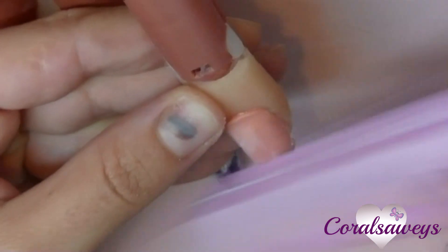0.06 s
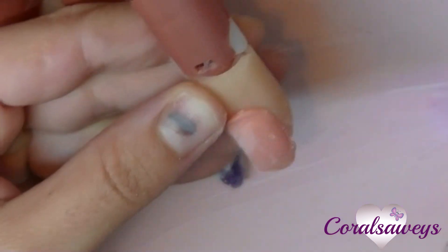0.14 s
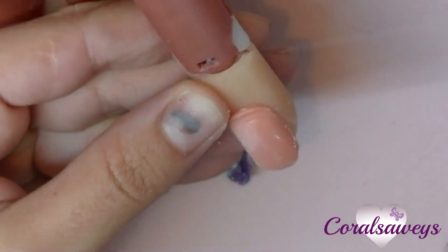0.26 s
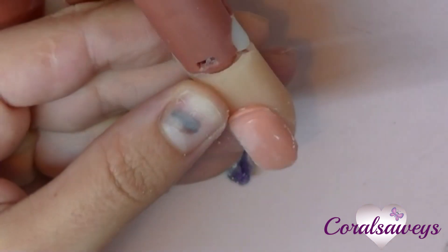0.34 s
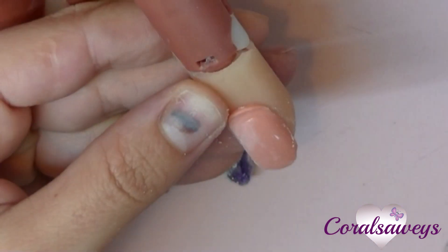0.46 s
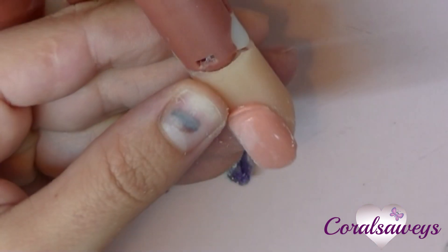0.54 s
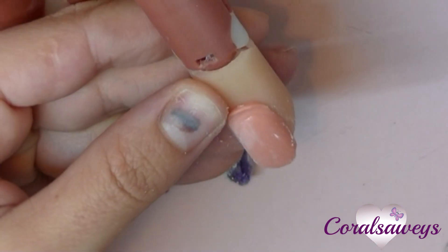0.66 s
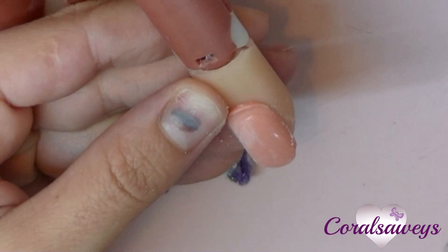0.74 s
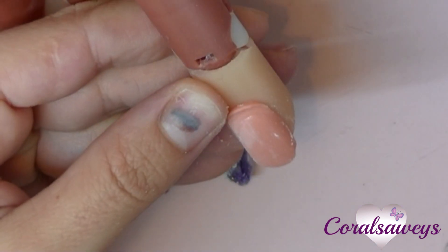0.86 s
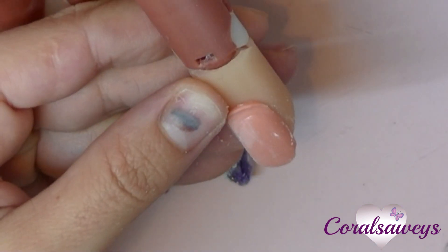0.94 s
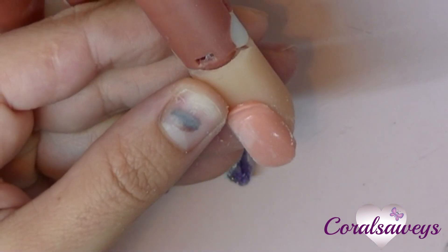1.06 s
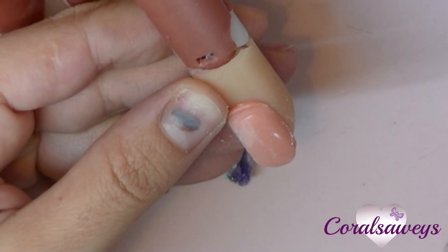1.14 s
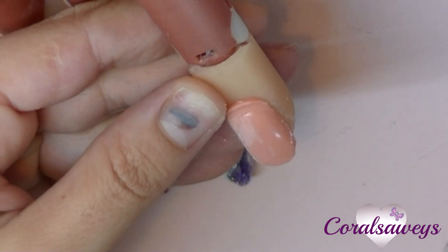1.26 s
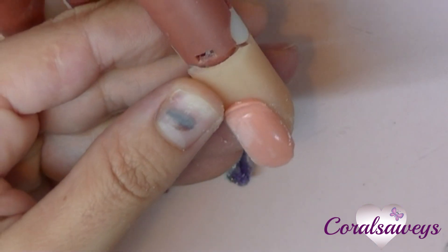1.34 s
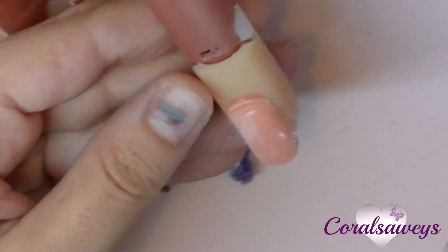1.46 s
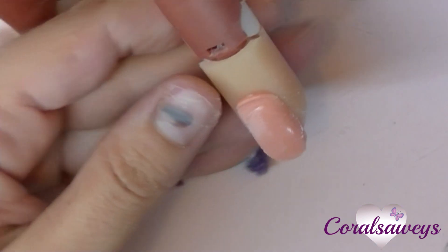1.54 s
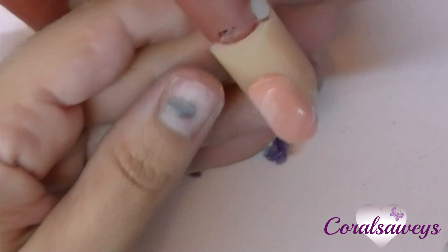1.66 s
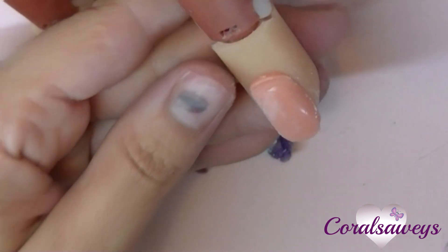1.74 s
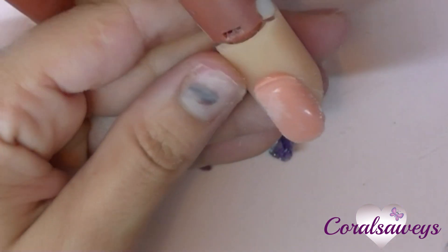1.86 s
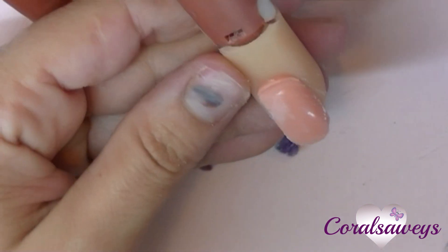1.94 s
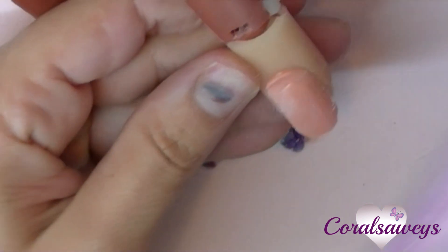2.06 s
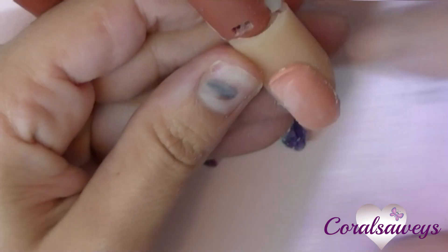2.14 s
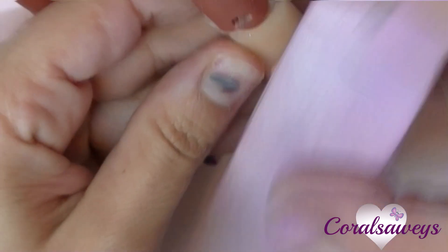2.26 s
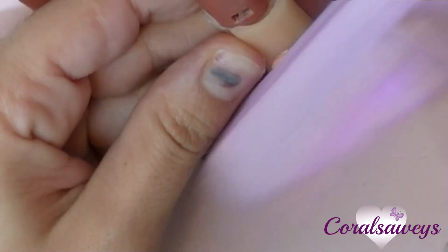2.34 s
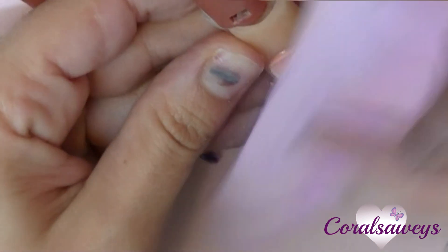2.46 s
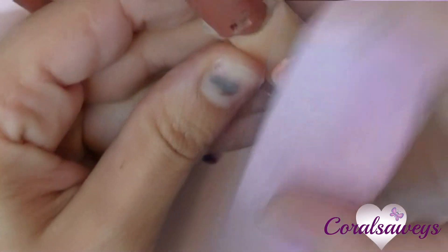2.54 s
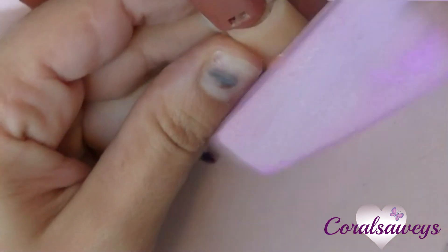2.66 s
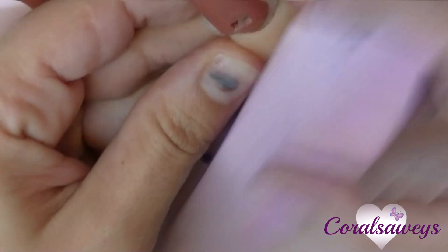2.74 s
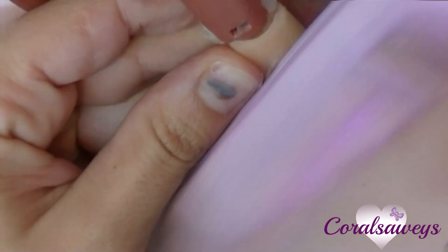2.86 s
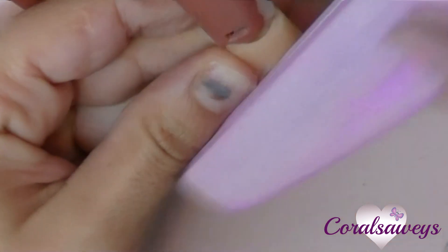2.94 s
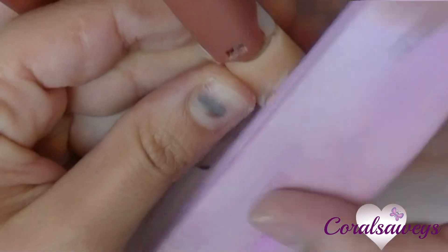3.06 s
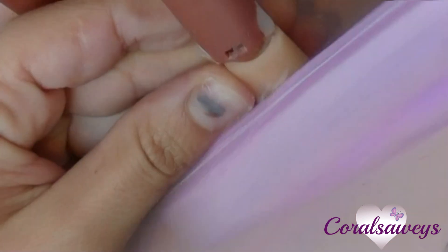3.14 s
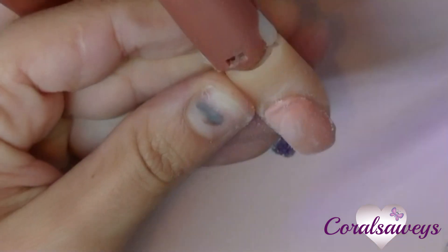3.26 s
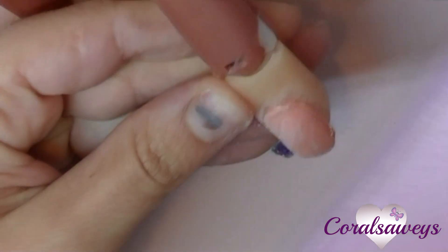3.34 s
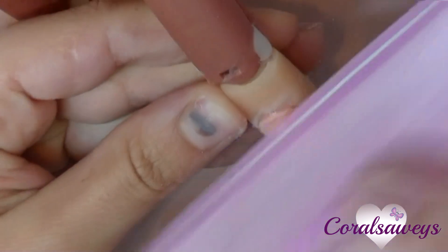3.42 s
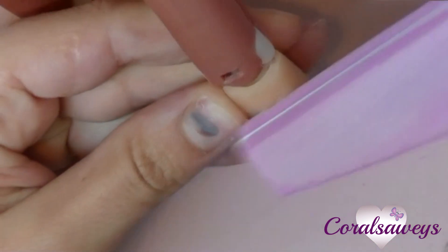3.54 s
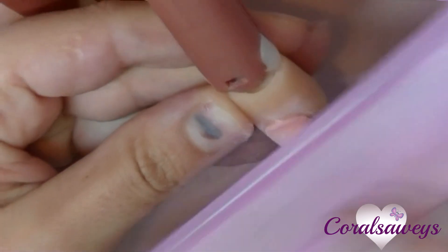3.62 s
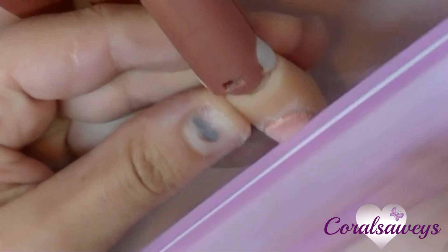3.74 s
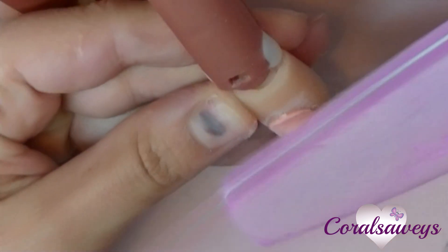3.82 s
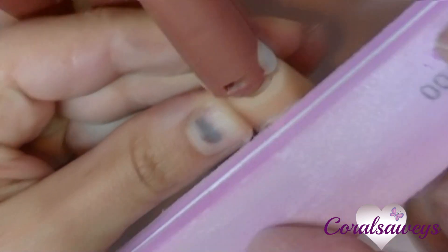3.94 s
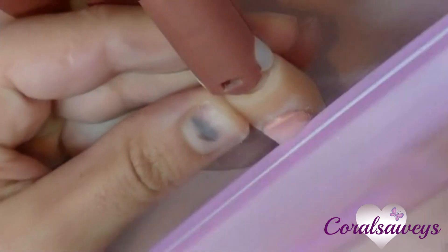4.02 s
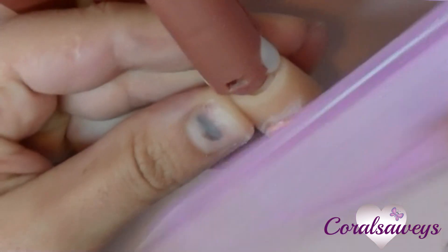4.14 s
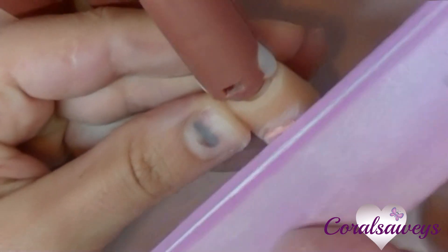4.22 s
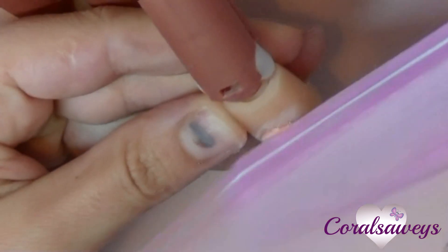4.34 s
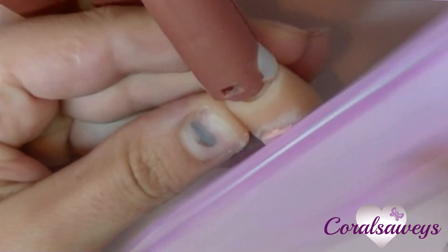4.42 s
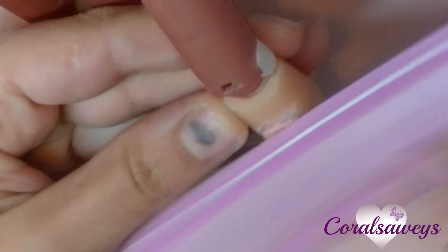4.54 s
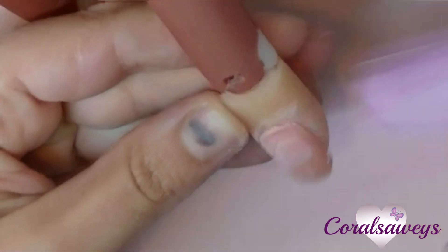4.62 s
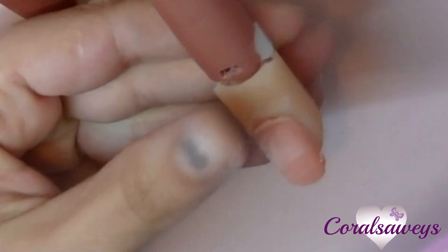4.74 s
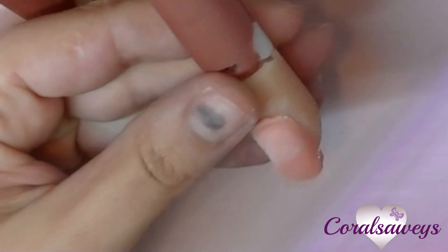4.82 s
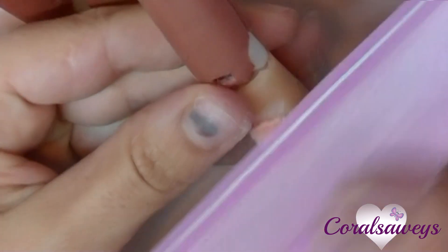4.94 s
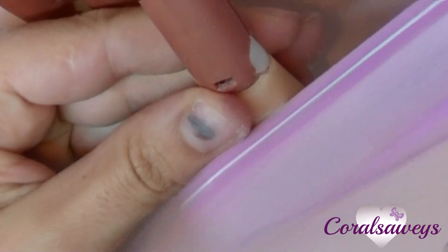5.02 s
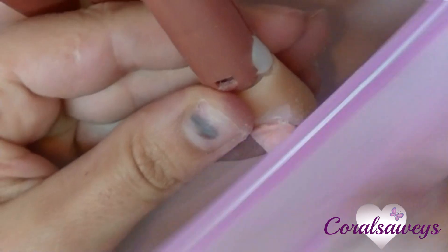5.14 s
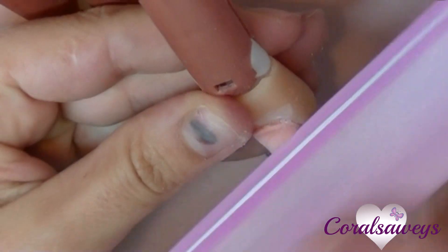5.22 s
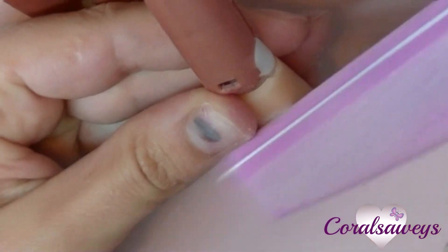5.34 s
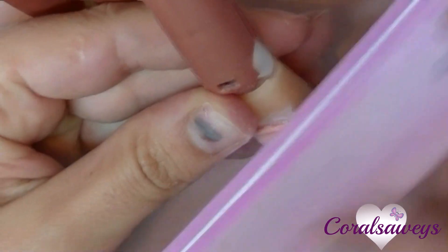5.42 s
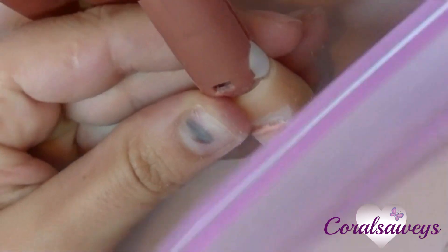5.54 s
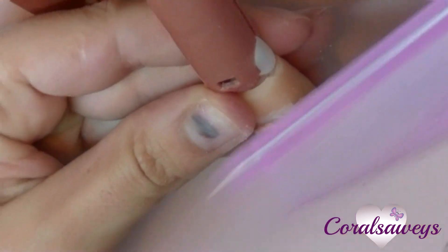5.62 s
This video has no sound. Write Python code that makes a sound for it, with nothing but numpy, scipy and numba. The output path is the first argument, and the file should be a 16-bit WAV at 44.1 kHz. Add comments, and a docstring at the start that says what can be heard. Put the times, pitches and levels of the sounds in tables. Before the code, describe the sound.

A buffer block scratches over a false nail in short, dry to-and-fro strokes, pausing for faint rustles before quick rhythmic rubbing resumes.

```python
"""A foam buffer block is rubbed to and fro over a nail on a plastic practice finger, close to the microphone.
Thousands of tiny grit slips drive a hiss, a gliding nail ring and the duller body of block and finger.
Hard catches crack and ring, and the hand bumps and drags on the table, shaking its modes.
Softer rubs and brushes follow the first strokes, and faint whistles of narrow noise come and go.
A small quiet room answers with a short diffuse tail over a steady bed of air noise."""
import sys
import numpy as np
from scipy import signal
from scipy.fft import rfft, irfft, next_fast_len
from scipy.io import wavfile
from scipy.ndimage import uniform_filter1d
from numba import njit

SR = 44100
rng = np.random.default_rng(int(sys.argv[2]) if len(sys.argv) > 2 else 0)


def generate_wav(signal):
    """Clip the signal to [-1, 1] and save it as 16-bit WAV at the path in sys.argv[1]."""
    frames = np.transpose(np.atleast_2d(signal))
    scaled = np.clip(frames, -1, 1) * 32767
    pcm = np.round(scaled).astype(np.int16)
    wavfile.write(sys.argv[1], SR, pcm)


N = 250929

# Strokes of the block over the nail; levels feed the mix in rubbing() and the drag in table():
# (start [s], length [s], rise [ms], rub level [dB], swell from start to end [dB], mid-stroke arch [dB],
#  nail ring level [dB], nail ring [Hz], grit ring [Hz], block body level [dB], brightness [dB],
#  table drag level [dB])
BLOCK_STROKES = [ (0.0, 0.068, 3.8, -33, -2.5, 2, -9, 4430, 7900, -14.5, 8, -49),
                 (0.101, 0.095, 2.5, -34, -2.5, 0.8, -10, 4200, 8000, -18.5, 6.5, -48),
                 (2.344, 0.13, 26, -32, 3, 2, 1, 4300, 7700, -15, 2, -53.5),
                 (2.515, 0.099, 4.3, -29, -1, -1, -1.5, 4350, 8100, -18.5, 0, -46.5),
                 (2.643, 0.1, 3.7, -28.5, -1, -1.5, -6.5, 4170, 7900, -18, 1, -42),
                 (2.773, 0.093, 3.3, -26.5, 0.5, -0.7, -1, 4490, 8150, -16.5, -1, -42),
                 (2.905, .100, 14, -28.5, -5.5, 2, 0.5, 4400, 7900, -13.5, 3, -42),
                 (3.048, 0.088, 17, -28.5, -1.5, 2, -2.5, 4350, 8400, -13.5, 1, -40),
                 (3.179, 0.12, 17, -28, 3, 1.2, -6.5, 4190, 7600, -16.5, 2, -46.5),
                 (3.505, 0.12, 30, -33.5, 5, 1, -11, 4100, 7100, -9.5, 5, -46),
                 (3.661, .100, 18, -30, -11, -1.6, -12, 4050, 7740, -14, 6, -47.5),
                 (3.795, 0.12, 15, -34, -3, 4.5, -19, 3980, 8100, -16.5, 4, -48),
                 (3.938, 0.1, 7, -31, .5, 0.5, -12, 3965, 8160, -17, 5, -54),
                 (4.075, 0.11, 1.8, -30.5, 0, -1, -14, 3900, 7900, -15.5, 5.5, -61),
                 (4.215, .100, 2.8, -32.5, -1, 5.5, -11, 4120, 7900, -15.5, 6.5, -48),
                 (4.344, .120, 11, -33.5, 0, 1, -31, 4120, 8150, -15, 6, -48.5),
                 (4.489, 0.092, 4, -31.5, -5.5, -0.3, -12, 4240, 7800, -15.5, 7, -48),
                 (4.604, 0.12, 9, -32, 5, 1, -16, 4130, 7740, -15.5, 4.5, -45),
                 (5.024, .119, 23, -33.5, 3, 3, -7.5, 4100, 7600, -13.5, 4, -62),
                 (5.182, 0.1, 18.5, -31, -10.5, 2.5, -8, 3960, 7200, -14.5, 2.5, -56),
                 (5.318, 0.1, 3, -31.5, 6, -1.7, -10, 4040, 7700, -15.5, 6, -49.5),
                 (5.452, 0.09, 8.5, -28, 1.5, -0.5, -9, 3830, 7650, -15.5, -1, -49.5),
                 (5.577, 0.11, 8, -31.5, 1, -0.1, -17, 4070, 7800, -16, 4, -52)]
# Softer rubs and brushes after the first strokes, with levels used as for the strokes:
# (start [s], length [s], rise [ms], rub level [dB], swell [dB], fall [dB/s], nail ring level [dB],
#  body level [dB], brightness [dB], table drag level [dB])
SOFT_RUBS = [(0.266, 0.028, 4, -46, -3, 700, -17, -13, -11, -57),
             (0.332, 0.084, 2, -41, 8.5, 365, -17, -13.5, 0, -46.5),
             (0.482, 0.13, 29, -36, 1.5, 650, -29, -21.5, -6, -68),
             (0.662, 0.18, 4, -53.5, -7, 300, -26, -21, -18, -58),
             (0.83, 0.16, 11, -48, 1, 300, -17, -19, 10, -58),
             (0.962, .110, 15, -41.5, -9, 600, -7, -12.5, 5, -45.5),
             (1.100, 0.025, 9.2, -45.5, -1.5, 200, -3, -13, 1, -58),
             (1.175, 0.062, 5, -57.5, 3, 300, -1, -5, -10, -68),
             (1.243, 0.19, 10, -54.5, -14.5, 800, 1, -6, -9, -60),
             (1.482, .110, 12, -55, 7.5, 150, -12, -20, -1, -58),
             (1.690, 0.022, 8, -54.5, 1, 250, -10, -24, -6, -58),
             (1.773, 0.088, 5, -51.5, -4, 550, -10, -18, 1, -58),
             (1.879, .150, 30, -40.5, -10, 520, -24, -25, -10, -61),
             (2.131, 0.072, 10, -44, 18.5, 282, -35, -27, -17, -72),
             (2.273, 0.033, 10, -50.5, 7, 550, -24, -24, -8, -64)]
# A coarse patch of grit changes the bite for a moment: (centre [s], level change [dB], width [ms])
GRIT_FLARES = [(3.295, -1, 6.6), (3.689, 6, 8), (3.872, 1.5, 4.3), (4.175, 1.5, 5), (4.268, 1.5, 8.8),
               (4.719, 3, 4), (5.225, 3, 7.3), (5.52, 2, 6.9), (5.668, 3, 6)]
RUN_GAP_S = 0.25                        # stroke starts further apart than this split two runs
TURN_SHARE, LAND_SHARE = 0.13, 0.5      # share of level at first contact: after a turn, after landing
FALL_DB_PER_S, LIFT_DB_PER_S = 900, 3000        # loss as the block stops, as it lifts off
LIFT_STEP_DB, TRAIL_DB_PER_S = 12, 350  # the edge of the block drags on faintly after the lift
NAIL_LINGERS = 0.17                     # share of the loss that the nail ring is spared
DRAG_FOLLOWS = 0.29                     # share of the loss that the table drag follows
SOFT_ARCH_DB, SOFT_NAIL_HZ, SOFT_GRIT_HZ = 0.64, 4760, 7700
LIFTED_DRAG_DB = -61                    # the hand resting on the table


def strokes():
    """Each contact rises, arches, swells or sags, then falls away; the loudest one sets the colour."""
    apart = np.diff([row[0] for row in BLOCK_STROKES]) > RUN_GAP_S
    touches = np.where(np.append(True, apart), LAND_SHARE, TURN_SHARE)
    falls = np.where(np.append(apart, False), LIFT_DB_PER_S, FALL_DB_PER_S)
    contacts = [(touch, fall, *row) for touch, fall, row in zip(touches, falls, BLOCK_STROKES)]
    for start, length, rise_ms, db, swell_db, fall, nail_db, *rest in SOFT_RUBS:
        contacts.append((TURN_SHARE, fall, start, length, rise_ms, db, swell_db, SOFT_ARCH_DB,
                         nail_db, SOFT_NAIL_HZ, SOFT_GRIT_HZ, *rest))

    rub = np.full(N, 1e-6)
    # rows: nail dB, nail Hz, grit Hz, body dB, brightness dB, drag dB
    idle = [-16.0, SOFT_NAIL_HZ, SOFT_GRIT_HZ, -16, 0, LIFTED_DRAG_DB]
    colour = np.tile(np.array(idle)[:, None], N)
    for touch, fall, start, length, rise_ms, db, swell_db, arch_db, *own in contacts:
        span = slice(round(start * SR), min(N, round((start + length + 0.2) * SR)))
        since = np.arange(span.stop - span.start) / SR
        done = np.minimum(since / length, 1)
        after = np.maximum(since - length, 0)
        loss_db = fall * after
        if fall == LIFT_DB_PER_S:
            loss_db = np.minimum(loss_db, LIFT_STEP_DB + TRAIL_DB_PER_S * after)
        shape_db = swell_db * (done - 0.5) + arch_db * np.sin(np.pi * done) - loss_db
        rise = 1 - (1 - touch) * np.exp(-since * 1000 / rise_ms)
        gain = amp(db + shape_db) * rise
        leads = gain > rub[span]
        colour[:, span] = np.where(leads, np.array(own)[:, None], colour[:, span])
        colour[0, span] += leads * NAIL_LINGERS * np.minimum(loss_db, 30)
        colour[5, span] -= leads * DRAG_FOLLOWS * np.minimum(loss_db, 40)
        rub[span] = np.hypot(rub[span], gain)

    t = np.arange(N) / SR
    flare_db = sum(db * np.exp(-0.5 * ((t - s) * 1000 / ms) ** 2) for s, db, ms in GRIT_FLARES)
    rub = rub * amp(flare_db)
    return uniform_filter1d(rub, size=60), uniform_filter1d(colour, size=400, axis=1)


# Spectrum of the grit hiss: (frequency [Hz], relative level per Hz [dB])
GRIT_SPECTRUM = [(1760, -17), (3000, -13), (3990, -9.5), (4950, -4), (7300, -0.5), (10200, -3.5),
                 (13400, -10.5), (14500, -17), (15800, -9.5)]
# Spectrum of the foam block's body: (frequency [Hz], relative level per Hz [dB])
BLOCK_SPECTRUM = [(410, -3), (700, -4), (882, -18), (1140, -5.5), (1500, -6), (2210, 0), (2410, -6),
                  (2630, 0.5), (3400, -2), (4420, -8.5), (7480, -120)]


def rubbing(rub, nail_db, nail_hz, grit_hz, body_db, bright_db):
    """One stream of slips drives the grit hiss, its ring, the nail, the block and the hollow finger."""
    force = slips(spread_db=0.5) * amp(0.79 * drift(44))      # pressure trembles along the stroke
    nail = gliding(force, nail_hz, 950.0, SR)
    nail = rms_one(gliding(nail, nail_hz, 950.0, SR))
    hollow = amp(-13) * rms_one(ring(force, 2750, 0.0081))    # the hollow finger

    force = patchy(force, depth_db=1.76)
    hiss = rms_one(coloured(force, GRIT_SPECTRUM))
    top = signal.sosfilt(signal.butter(2, 10500, "high", fs=SR, output="sos"), hiss)
    hiss = hiss + (amp(bright_db) - 1) * top                  # faster, lighter contact is brighter
    grit = rms_one(gliding(force, grit_hz * amp(0.5 * drift(21)), 2130.0, SR))
    body = rms_one(coloured(force, BLOCK_SPECTRUM)) * amp(0.28 * drift(40))

    mix = amp(-2.5) * hiss + amp(-8.5) * grit
    mix = mix + amp(nail_db - 8) * nail + amp(body_db) * (body + hollow)
    return rub * mix


SLIPS_PER_S = 9000


def slips(spread_db):
    """Grains of grit let go at random moments and in either direction, larger slips being rarer."""
    sizes = amp(spread_db * np.minimum(rng.exponential(1, N), 4.2))
    sizes = sizes * rng.choice([-1, 1], N)
    return rms_one(sizes * (rng.random(N) < SLIPS_PER_S / SR))


def patchy(x, depth_db):
    """The contact wanders over the nail, so each narrow band swells and sinks on its own."""
    size, edges = next_fast_len(N), np.geomspace(600, 18000, 17)
    spectrum = rfft(x, size)
    which = np.digitize(np.arange(size // 2 + 1) * SR / size, edges[1:-1])
    out = np.zeros(N)
    for k in range(len(edges) - 1):
        band = irfft(spectrum * (which == k), size)[:N]
        out += amp(depth_db * drift(5.6)) * band
    return out


# Something hard catches or knocks: (time [s], level before a 6 dB lift [dB], ring [Hz], decay [ms])
HARD_CATCHES = [(1.047, -33.5, 2670, 1.5), (1.056, -38.5, 1800, 6.2), (1.058, -46, 660, 24),
                (1.06, -42, 1296, 5.4), (1.114, -44, 6900, 1.2), (1.156, -46, 2700, 2.9),
                (1.268, -34, 2900, 0.75), (1.705, -42.5, 8150, 1.3), (1.801, -39, 2830, 0.64),
                (1.88, -35, 7600, 2), (1.9874, -24, 3150, 0.62), (1.988, -18.5, 9900, 0.98),
                (1.9901, -19.5, 3800, 0.38), (2.0173, -37, 3420, 0.94), (2.0175, -26, 9600, 0.67),
                (2.599, -16.5, 7800, 1.6), (2.768, -24, 8000, 0.76), (2.779, -13.5, 8900, 0.7),
                (4.718, -20, 6700, 1), (5.164, -35, 2500, 1.2), (5.663, -27.5, 4360, 3.5)]


def ticks():
    """Each catch is a broad crack and a ring; the crack dies with the ring or sooner."""
    out, ms = np.zeros(N), np.arange(5000) / SR * 1000
    for s, db, hz, decay_ms in HARD_CATCHES:
        shape = (1 - np.exp(-ms / 0.32)) * np.exp(-ms / decay_ms)
        tone = shape * np.sin(2 * np.pi * hz * ms / 1000)
        crack = rng.standard_normal(5000) * np.exp(-ms / min(decay_ms, 1.2))
        tick = tone + 0.27 * crack
        part = out[round(s * SR):][:5000]
        part += amp(db + 6) * tick[:len(part)]
    return out


# Hand bumps on the table: (time [s], relative level [dB], base pitch [Hz])
HAND_BUMPS = [(0.004, -18, 292), (0.28, -32, 260), (0.359, -31, 553), (0.446, -34.5, 244), (0.49, -37, 139),
              (0.774, -38, 228), (0.8, -37.5, 170), (0.83, -46, 150), (0.856, -45.5, 290),
              (0.953, -33, 131.5), (1.009, -40.5, 650), (1.02, -38, 170), (1.041, -27, 248),
              (1.066, -36, 191), (1.056, -37, 680), (1.088, -28.5, 150), (1.875, -39.5, 154),
              (1.985, -34.5, 702), (2.499, -33.5, 247), (2.594, -39, 286), (2.643, -22, 220),
              (2.944, -24, 306), (3.213, -30.5, 280), (3.515, -37, 193), (3.61, -46, 270),
              (3.833, -32.5, 292), (3.9, -33.5, 251), (4.181, -24, 242), (4.387, -33.5, 266),
              (4.49, -29, 267), (4.664, -34, 460), (5.045, -37, 250), (5.163, -24.5, 276),
              (5.344, -32.5, 248), (5.614, -26, 265), (5.654, -32.5, 450)]
# Modes of the table: (frequency [Hz], relative level [dB], t60 [s])
TABLE_MODES = [(141, -23, 0.2), (173, -11, 0.15), (206.8, -7, 0.38), (263.7, -1, 0.31), (291.8, -3.5, 0.35),
               (317, 9.5, 0.021), (460, 6, 0.053), (540, -13.5, 0.033), (616, -1.5, 0.12),
               (741, -5.5, 0.089), (860, -6, 0.065), (1430, -58, 0.056), (1800, -23, 0.077),
               (2100, -33, 0.098)]


def table(drag_db):
    """Bumps thud directly; they and the dragging hand shake the table, modes near a bump's pitch most."""
    out, t = np.zeros(N), np.arange(2000) / SR
    drag = amp(drag_db - 40 + 4.25 * drift(27)) * rng.standard_normal(N)
    pushes = rng.standard_normal((len(HAND_BUMPS), 2000))
    chance_db = rng.normal(0, 2.36, (len(HAND_BUMPS), len(TABLE_MODES)))
    fade = (1 - np.exp(-t / 0.0066)) * np.exp(-t / 0.0053)    # press and release, in seconds
    for s, db, bump_hz in HAND_BUMPS:
        # pitch bends up, then sags as the hand settles
        thud = fade * np.sin(2 * np.pi * bump_hz * t * (1 + 0.99 * fade))
        part = out[round(s * SR):][:2000]
        part += (amp(db + 4.0) * thud)[:len(part)]

    for k, (hz, level_db, t60) in enumerate(TABLE_MODES):
        force = drag.copy()
        for (s, db, bump_hz), push, luck_db in zip(HAND_BUMPS, pushes, chance_db):
            octaves_off = abs(np.log2(hz / bump_hz))
            push_db = db - 10.5 - 8.3 * octaves_off + luck_db[k]
            part = force[round(s * SR):][:2000]
            part += (amp(push_db) * push * fade / np.linalg.norm(fade))[:len(part)]
        out += amp(level_db) * ring(force, hz, t60)
    return out


# Faint short whistles: (start [s], end [s], frequency [Hz], level [dB])
FAINT_WHISTLES = [(2.15, 2.42, 1170, -60), (4.66, 4.9, 1395, -54.5), (4.69, 4.84, 2620, -60.5)]


def whistles():
    """Noise through a narrow resonance, swelling a little faster than it fades."""
    out, t = np.zeros(N), np.arange(N) / SR
    for start, end, hz, db in FAINT_WHISTLES:
        phase = np.clip((t - start) / (end - start), 0, 1)
        tone = rms_one(ring(rng.standard_normal(N), hz, 0.073))
        out += amp(db) * np.sin(np.pi * phase ** 0.77) * tone
    return out


# Decay of the room: (frequency [Hz], t60 [s])
ROOM_DECAY = [(150, 0.21), (1000, 0.73), (4000, 0.27), (8000, 0.34), (14000, 0.024)]


def room(x):
    """Two independent diffuse tails: octave bands of noise, each dying at its own rate."""
    t, tails = np.arange(SR // 2) / SR, 0
    for hz in 90 * 2.0 ** np.arange(8):
        edges = [hz / np.sqrt(2), hz * np.sqrt(2)]
        band = signal.butter(2, edges, "band", fs=SR, output="sos")
        noise = signal.sosfilt(band, rng.standard_normal((2, len(t))))
        tails = tails + noise * amp(-60 * t / at_hz(ROOM_DECAY, hz))
    tails = tails * (t > 0.004)
    tails = tails / np.sqrt((tails ** 2).sum(axis=1, keepdims=True))
    return signal.fftconvolve(x[None], tails, axes=1)[:, :N]


# Spectrum of the room's air noise: (frequency [Hz], relative level per Hz [dB])
AIR_SPECTRUM = [(18, -50), (30, -14), (193, -4), (279, -2), (523, -10.5), (596, -13), (698, -4.5),
                (1060, -5.5), (1310, -7), (2460, -13), (7580, -19), (15800, -29)]


def room_air():
    """Steady coloured noise whose level wavers slightly."""
    noise = rms_one(coloured(rng.standard_normal(N), AIR_SPECTRUM))
    return amp(-56.5 + 0.62 * drift(5.5)) * noise


# Spectrum given to the side signal: (frequency [Hz], relative gain [dB])
SIDE_SPECTRUM = [(60, -17.5), (180, -20.5), (550, -17), (1650, -33), (4970, -29), (15000, -29)]


def sides(tail, air):
    """A faint side signal, strongest in the lows: room tail and air, coloured together."""
    return coloured(amp(-22.0) * tail + amp(15) * air, SIDE_SPECTRUM)


def amp(db):
    """Decibels to a linear factor."""
    return 10 ** (np.asarray(db) / 20)


def rms_one(x):
    """Scales x to an RMS of 1."""
    return x / np.sqrt(np.mean(x ** 2) + 1e-20)


def at_hz(points, hz):
    """Reads a two-column table at hz, along log frequency."""
    points = np.array(points)
    return np.interp(np.log(hz), np.log(points[:, 0]), points[:, 1])


def coloured(x, points):
    """Filters x by a (frequency [Hz], gain [dB]) table."""
    size = next_fast_len(N)
    hz = np.arange(size // 2 + 1) * SR / size + 1             # 1 Hz up keeps the log finite
    return irfft(rfft(x, size) * amp(at_hz(points, hz)), size)[:N]


def drift(rate_hz):
    """Slow random wander with an RMS of 1: noise through two equal one-pole smoothers."""
    r = np.exp(-2 * np.pi * rate_hz / SR)
    noise = rng.standard_normal(N + SR)                       # the first second settles the filter
    return rms_one(signal.lfilter([1], [1, -2 * r, r * r], noise)[SR:])


def ring(clicks, hz, t60):
    """A two-pole resonance: a unit click sets off a dying sine that starts at height 1."""
    r, w = amp(-60 / (t60 * SR)), 2 * np.pi * hz / SR
    return signal.lfilter([0, np.sin(w)], [1, -2 * r * np.cos(w), r * r], clicks + 1e-18)


@njit
def gliding(x, hz, width_hz, sr):
    """A two-pole resonance whose centre moves."""
    out, r = np.zeros(len(x)), np.exp(-np.pi * width_hz / sr)
    for i in range(2, len(x)):
        feedback = 2 * r * np.cos(2 * np.pi * hz[i] / sr) * out[i - 1] - r * r * out[i - 2]
        out[i] = x[i] - x[i - 2] + feedback
    return out


def scene():
    """Mixes the near sounds, their room tail and the air into a narrow stereo picture."""
    rub, (nail_db, nail_hz, grit_hz, body_db, bright_db, drag_db) = strokes()
    thuds = table(drag_db)
    near = rubbing(rub, nail_db, nail_hz, grit_hz, body_db, bright_db)
    near = near + thuds + ticks() + whistles()
    small = signal.butter(6, 115, "high", fs=SR, output="sos")    # small things radiate no deep bass
    near = signal.sosfilt(small, near)
    mid_tail, side_tail = room(near)
    mid = near + amp(-12) * mid_tail + room_air()
    side = sides(side_tail, room_air())
    side = side + amp(-23) * signal.sosfilt(small, thuds)         # the table is a little nearer the left
    return np.array([mid + side, mid - side])


def record(dry):
    """A steep low-pass cuts the top, 60 dB down from 16.2 kHz."""
    return signal.sosfilt(signal.cheby2(16, 60, 16200, fs=SR, output="sos"), dry)


dry = scene()
out = record(dry)
generate_wav(out)
```